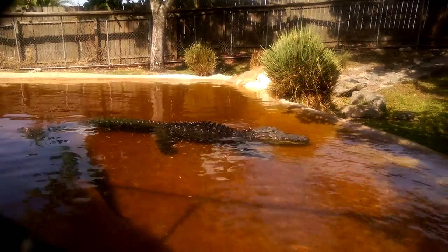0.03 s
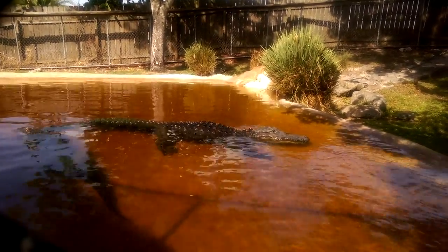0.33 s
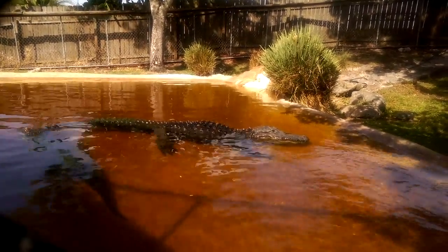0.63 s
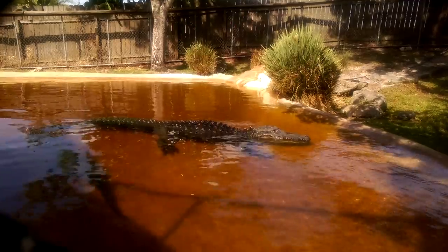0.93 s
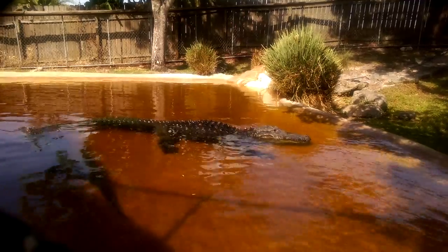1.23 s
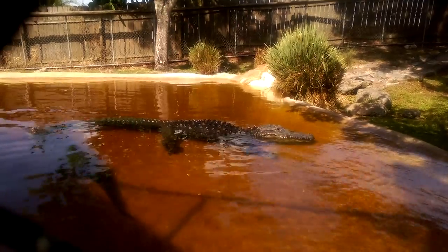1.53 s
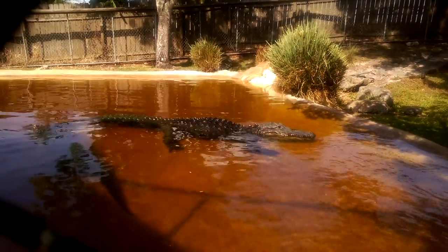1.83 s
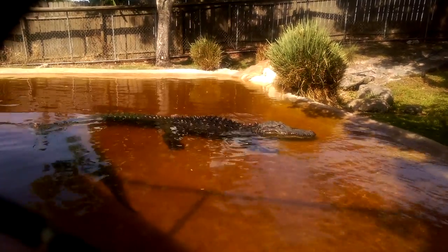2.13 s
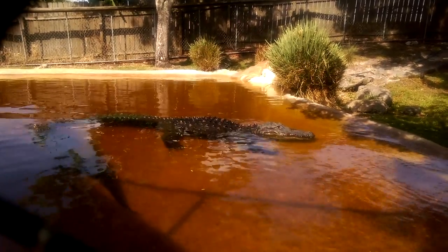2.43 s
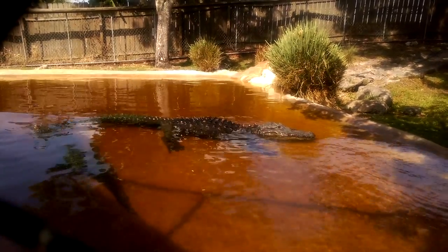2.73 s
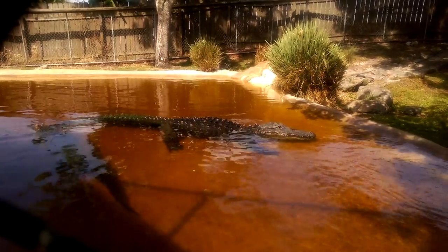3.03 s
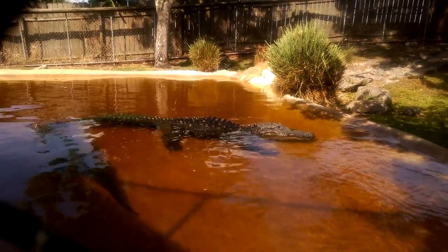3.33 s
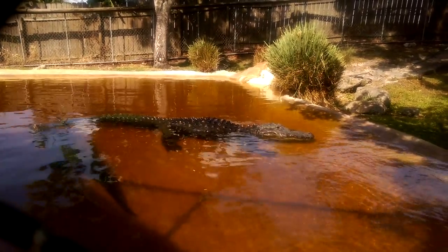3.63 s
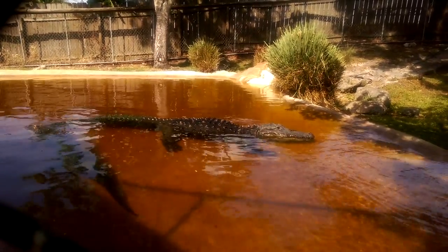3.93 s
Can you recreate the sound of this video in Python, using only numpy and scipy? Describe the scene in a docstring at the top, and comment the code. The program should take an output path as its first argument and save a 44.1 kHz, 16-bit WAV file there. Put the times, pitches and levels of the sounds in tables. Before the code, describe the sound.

A bird close by gives five quick, shrill calls, each rising and turning hoarse as it falls, with a brief echo around a pond yard. Steady hiss, a low machine hum and distant traffic continue behind it.

```python
"""Shrill bird by a pond

Close to a stereo pair of microphones in a fenced yard, a bird gives five shrill calls, each an arch
of harmonics that turns hoarse as it falls. Water, walls and fences throw them back. Farther off,
traffic swells twice with one engine note sinking, machinery hums, and an even hiss fills the air."""
import sys
import numpy as np
from scipy import signal
from scipy.fft import rfft, irfft
from scipy.io import wavfile
from scipy.ndimage import uniform_filter1d

SR = 44100
rng = np.random.default_rng(int(sys.argv[2]) if len(sys.argv) > 2 else 0)


def wrap_up_sound(samples):
    """Save the sound to the file named by the first command line argument, as 16-bit audio."""
    columns = np.atleast_2d(samples).T
    # keep every value between -1 and 1, then stretch to whole-number steps
    tamed = np.clip(columns, -1, 1)
    steps = np.round(tamed * 32767).astype(np.int16)
    wavfile.write(sys.argv[1], SR, steps)


N = 176400
T = np.arange(N) / SR
FREQS = np.fft.rfftfreq(N, 1 / SR)

# The calls (time of the top [s], rise [s], fall [s], top pitch [Hz], level [dB],
# 2nd harmonic lift [dB], lift at the start [dB], swell into the fall [dB], shrill harmonics lift [dB])
CALLS = [(.986, 0.042, .066, 1312, -0.5, 2, -9, 1.5, 3), (1.285, 0.048, 0.08, 1309, -1, -3.5, 1, 4, 0.5),
         (1.589, 0.047, 0.071, 1343, 1.5, -1.5, -3.5, 1, 1), (1.830, .043, .085, 1302, 2, -2, -3.5, -1, 1),
         (2.125, 0.041, 0.08, 1307, 2, -5, 1.5, 0.5, -1)]
# Every third harmonic leads the voice (multiple of the pitch [x], level [dB])
LEADING_HARMONICS = [(3, 2), (6, -1.5), (9, -6.5), (12, -9)]
# The weaker harmonics between them (multiple of the pitch [x], level [dB])
WEAK_HARMONICS = [(2, -8), (4, -16.5), (5, -7), (7, -23), (8, -11), (10, -16), (11, -27)]
# Peaks and dips in the tone of the calls (frequency [Hz], gain [dB])
CALL_COLOUR = [(1500, -16), (2100, 8), (2380, 4), (2650, 4), (2950, -4), (3450, -4), (3950, -3.5),
               (4400, -10), (5200, -1.5), (6000, -9), (6700, 4.5), (7300, 1), (7900, -7.5), (9300, -0.5),
               (10500, -8), (11800, -4), (13000, -2), (14200, -15), (15500, -11)]
def bird():
    """Close to the microphones, each call arches in pitch: full at the top, hoarse as it falls."""
    attack_s, release_s = .00303, .032
    jitter, shimmer = .0028 * walk(1100), undb(1.8 * walk(220))
    rasps = {k: rasp(k) for k, _ in LEADING_HARMONICS + WEAK_HARMONICS}
    out = np.zeros(N)
    for top, rise, fall, hz, db, second_db, start_db, swell_db, shrill_db in CALLS:
        on = (T > top - rise - attack_s / 2) & (T < top + fall + release_s / 2)
        t = T[on] - top
        along = np.where(t < 0, -t / rise, t / fall)  # 0 at the top of the arch, 1 at its ends
        bend = along ** 2.6
        pitch_drop = np.where(t < 0, .29 * bend, .38 * bend / (bend + .46))
        hoarseness = 1 + 5 * np.clip(2 * t / fall, 0, 1) ** 2
        pitch = hz * (1 - pitch_drop) * (1 + hoarseness * jitter[on])
        phase = 2 * np.pi * np.cumsum(pitch) / SR
        gate = np.clip((t - t[0]) / attack_s, 0, 1) * np.clip((t[-1] - t) / release_s, 0, 1)
        level = undb(db + np.interp(t / rise, [-1, 0, 1], [start_db, 0, swell_db]))
        dull_db = np.where(t < 0, .13, .11) * along ** 2  # duller towards the ends

        def harmonic(k):
            tone = np.imag(rasps[k][on] * np.exp(1j * k * phase))
            return tone * undb(shrill_db * (k >= 9) - dull_db * k ** 2)

        leading = sum(undb(d) * harmonic(k) for k, d in LEADING_HARMONICS)
        weak = sum(undb(d + second_db * (k == 2)) * harmonic(k) for k, d in WEAK_HARMONICS)
        out[on] += gate * level * shimmer[on] * (leading + weak * undb(-20 * along ** 2))
    return undb(-33) * colour(out, CALL_COLOUR)


def rasp(k):
    """Harmonic k flickers in strength and phase: low ones are nearly clean, high ones rasp."""
    depth = .16 + .003 * k ** 2
    flicker = unit(undb(1.8 * walk(60)))
    return flicker * (1 + depth * (walk(1400) + 1j * walk(1400)))


# Off the water and near walls (left delay [s], right delay [s], left gain [dB], right gain [dB])
NEAR_REFLECTIONS = [(.00043, .00082, -6, -13), (.0031, .00281, -12, -13), (.0055, .00535, -11, -11),
                    (.0091, .0097, -13, -13), (.0158, .0153, -16, -16)]
# Fence echo and tail come back duller than the call (frequency [Hz], gain [dB])
YARD_COLOUR = [(2700, 3), (3400, 0.5), (3800, 0), (4100, -2), (6500, 1), (8000, -1), (10000, -1),
               (12000, -5)]
# The bird's lean to the left microphone; each side takes about half (frequency [Hz], lean [dB])
BIRD_LEAN = [(60, -0.5), (110, -0.5), (200, -1.0), (380, -2.0), (700, -1.5), (1290, 1), (2380, -12),
             (4400, 4.5), (8120, -14.5), (15000, -11)]
def yard(calls):
    """Near surfaces return quick reflections, the slatted fence a blurred echo, the yard a short tail."""
    t60_s, build_s, fence_delay_s, fence_spread_s = .43, .004, .063, .0045
    tail = rng.standard_normal((2, N)) * undb(-60 * T / t60_s) * (1 - np.exp(-T / build_s))
    slats = rng.standard_normal((2, N)) * bell(T, fence_delay_s, fence_spread_s)
    response = colour(undb(-6) * unit(tail) + undb(-12) * unit(slats), YARD_COLOUR) / np.sqrt(N)
    response[:, 0] += 1  # straight from bird to microphones
    for left_s, right_s, left_db, right_db in NEAR_REFLECTIONS:
        response[0, round(left_s * SR)] += undb(left_db)
        response[1, round(right_s * SR)] += undb(right_db)
    left, right = signal.fftconvolve(calls[None], response, axes=1)[:, :N]
    return from_right([colour(left, BIRD_LEAN, share=.52), colour(right, BIRD_LEAN, share=-.44)])


# Steady bed of the distant road (frequency [Hz], relative density [dB])
ROAD_SPECTRUM = [(15, -26), (30, -14), (48, -4.5), (65, 0.5), (100, -1.5), (160, -4), (250, -7),
                 (340, -11.5), (450, -27.5), (700, -21), (1300, -39)]
# Two vehicles passing far off (time [s], level [dB])
FIRST_PASS = [(0, -39.5), (.25, -40.5), (.42, -35.5), (.62, -34), (.8, -34.5), (1.0, -40), (1.35, -39),
              (1.6, -61), (2.2, -88)]
SECOND_PASS = [(1.9, -67), (2.05, -49.5), (2.2, -41), (2.4, -40.5), (2.5, -38), (2.62, -39.5), (2.75, -40),
               (3.0, -38), (3.25, -43.5), (4, -59)]
# Their drones as they reach the yard (frequency [Hz], relative density [dB])
FIRST_DRONE = [(50, -21), (90, -1), (130, 2.5), (190, 0.5), (245, -26), (330, -12.5), (400, -19.5),
               (470, -13), (550, -40), (620, -16.5), (850, -36), (1600, -36)]
SECOND_DRONE = [(50, -17), (100, -3), (150, -6.5), (205, -0.5), (275, -19), (420, -17.5), (510, -29),
                (590, -14.5), (720, -19.5), (900, -35), (1600, -29)]
def traffic():
    """Well beyond the fence, two vehicles swell out of a steady rumble."""
    passes = vehicle(FIRST_PASS, FIRST_DRONE) + vehicle(SECOND_PASS, SECOND_DRONE)
    return passes + undb(-43) * far_noise(ROAD_SPECTRUM)


def vehicle(levels, drone):
    """A distant vehicle comes and goes; narrow bands of its drone flutter separately."""
    band_hz, flutter_db = 100, 2.5
    spectrum, out = rfft(far_noise(drone)), 0
    for hz in np.arange(0, 1700, band_hz):
        band = np.maximum(1 - np.abs(FREQS - hz) / band_hz, 0)
        out += irfft(spectrum * band, N) * undb(flutter_db * walk(8.9))
    return unit(out) * undb(curve(levels))


def far_noise(spectrum, unrelated_hz=2200):
    """Distant noise: alike at both microphones in the bass, less so higher up."""
    mid, side = rng.standard_normal((2, N))
    side = irfft(rfft(side) * np.minimum(FREQS / unrelated_hz, 1), N)
    return unit(colour(np.array([mid + side, mid - side]), spectrum))


# One engine heard from afar (time [s], firing rate [Hz], level [dB])
ENGINE_RUN = [(2.1, 143, -52), (2.25, 144.2, -39), (2.4, 147.2, -39.5), (2.47, 167.3, -48),
              (2.56, 168.2, -38), (2.7, 160, -37), (2.82, 150.3, -38.5), (2.97, 143.3, -38.5),
              (3.25, 139, -60)]
# Its partials (multiple of the firing rate [x], relative level [dB])
ENGINE_PARTIALS = [(1, 3), (1.5, -26), (2, -12.5), (3, -28), (4, -37)]
def engine():
    """The firing of a distant engine makes a note that climbs, then sinks."""
    firing_hz = curve(ENGINE_RUN) * (1 + .005 * walk(20))
    phase = 2 * np.pi * np.cumsum(firing_hz) / SR
    note = sum(undb(db + 2 * walk(21.97)) * np.sin(k * phase) for k, db in ENGINE_PARTIALS)
    return unit(note) * undb(curve(ENGINE_RUN, column=2))


# Brief rises in the far drone (time [s], half length [s], centre [Hz], width [Hz], level [dB])
DRONE_LIFTS = [(.1, 0.15, 149.6, 14, -39.5), (.6, 0.09, 169, 12, -41.5), (0.154, 0.087, 460, 60, -49.5),
               (0.408, 0.043, 152, 41, -35), (.47, 0.13, 377, 99, -52.5), (0.795, 0.12, 595, 60, -60),
               (0.977, 0.033, 457, 44, -47.5), (2.267, 0.13, 637, 110, -52), (2.398, 0.012, 187.3, 66, -34),
               (2.62, 0.032, 527, 170, -45.5)]
def drone_lifts():
    """Narrow bands of the distant traffic drone rise briefly now and then."""
    out = np.zeros(N)
    for at, half_length, hz, width, db in DRONE_LIFTS:
        band = irfft(rfft(rng.standard_normal(N)) * bell(FREQS, hz, width), N)
        out += undb(db) * unit(band) * bell(T, at, half_length)
    return out


# Tones of the machinery (frequency [Hz], level [dB])
HUM_TONES = [(55, -49.5), (64.7, -44), (73.8, -43.5), (87.4, -51.5), (103.8, -43), (120, -44.5),
             (142.5, -51), (167, -52.5), (331, -61), (401, -63.5)]
# Slow drift of the whole hum (time [s], gain [dB])
HUM_DRIFT = [(0, -3.5), (1.1, 1), (1.7, 0.5), (2.6, -1.5), (4, -2)]
def machinery():
    """Behind the bird, machinery hums in low tones that waver and beat against each other."""
    out = np.zeros(N)
    for hz, db in HUM_TONES:
        turns = rng.random() + np.cumsum(hz * (1 + .00292 * walk(3.95))) / SR
        out += np.sqrt(2) * undb(db + 1.5 * walk(2.99)) * np.sin(2 * np.pi * turns)
    return out * undb(curve(HUM_DRIFT))


# Hiss at each microphone (frequency [Hz], relative density [dB])
LEFT_AIR = [(200, -21), (600, -7.5), (1000, -7), (1200, -3), (1500, -1), (1900, -2.5), (2600, -12),
            (3250, -3.5), (3800, -3), (4150, -7.5), (4500, -6), (5000, -9.5), (6100, -11.5), (6700, -13),
            (9300, -12.5), (11200, -25), (13600, -45), (15500, -43)]
RIGHT_AIR = [(200, -26), (650, -3), (1000, -7), (1400, -1), (1780, 1), (1930, 3), (2100, -2.5), (2600, 2.5),
             (3300, -3), (3850, -3), (4400, -16), (6300, -4.5), (8500, -8.5), (9600, -10), (11000, -16.5),
             (13800, -18.5), (15500, -59)]
# The part that arrives from one direction (frequency [Hz], share of the power [0-1])
DIRECTED_SHARE = [(200, 0.59), (1400, 0.84), (2500, 0.21), (5000, 0.48), (15000, 0.65)]
def hiss():
    """Even outdoor hiss with a slight flicker, partly from the right and partly from all around."""
    hz, share = np.array(DIRECTED_SHARE).T
    share = np.interp(FREQS, hz, share)
    directed, diffuse = rfft(rng.standard_normal(N)), rfft(rng.standard_normal((2, N)))
    left, right = irfft(np.sqrt(share) * directed + np.sqrt(1 - share) * diffuse, N)
    left = undb(-41.5) * unit(colour(left, LEFT_AIR))
    right = undb(-38) * unit(colour(right, RIGHT_AIR))
    flicker = undb(walk(60))
    return from_right([left, right]) * flicker


def from_right(pair, lag_samples=16):
    """Sound from the right reaches the left microphone a little later."""
    return np.array([np.roll(pair[0], lag_samples), pair[1]])


def undb(db):
    """Decibels to gain."""
    return 10 ** (np.asarray(db) / 20)


def unit(x):
    """Scale to rms 1."""
    return x / np.sqrt(np.mean(x ** 2))


def bell(x, centre, width):
    """Gaussian bump of height 1."""
    return np.exp(-.5 * ((x - centre) / width) ** 2)


def curve(rows, column=1):
    """One column of a timed table, at every sample."""
    rows = np.array(rows)
    return np.interp(T, rows[:, 0], rows[:, column])


def colour(x, points, share=1):
    """Filter by (frequency [Hz], gain [dB]) points; share scales the decibels."""
    hz, db = np.array(points).T
    gain_db = share * np.interp(np.log(FREQS + 1), np.log(hz), db)
    return irfft(rfft(x) * undb(gain_db), N)


def walk(rate):
    """Smooth random wander of rms 1 that changes about rate times a second."""
    hold = max(int(SR / rate), 1)
    held = rng.standard_normal(N)[np.arange(N) // hold]
    return unit(uniform_filter1d(uniform_filter1d(held, hold), hold))


def scene():
    """The bird close by, to the right; hiss all round; far traffic and hum slightly to the right."""
    near = yard(bird()) + hiss()
    far = engine() + traffic() + drone_lifts() + machinery()
    lean_right = undb([[-.45], [.45]])
    return near + lean_right * from_right(far, lag_samples=9)


def record(dry):
    """The recorder cuts the top treble steeply."""
    top_hz = 15600
    return signal.sosfilt(signal.ellip(14, .2, 80, top_hz, fs=SR, output="sos"), dry)


dry = scene()
out = record(dry)
wrap_up_sound(out)
```